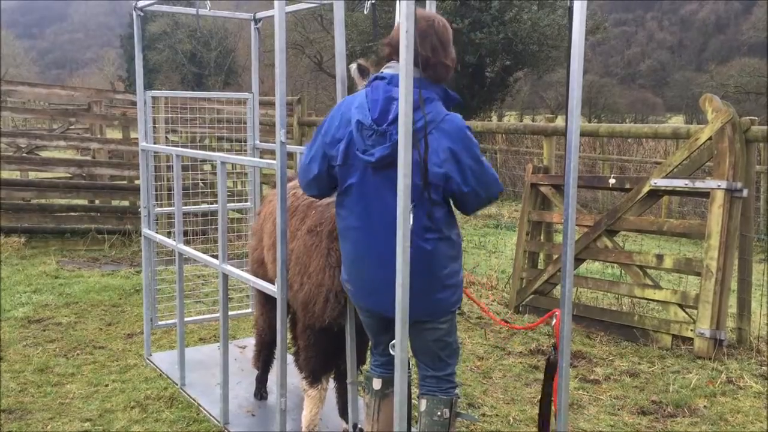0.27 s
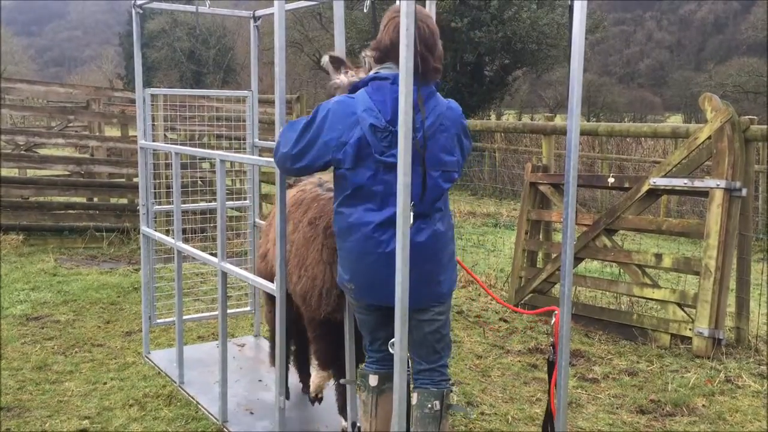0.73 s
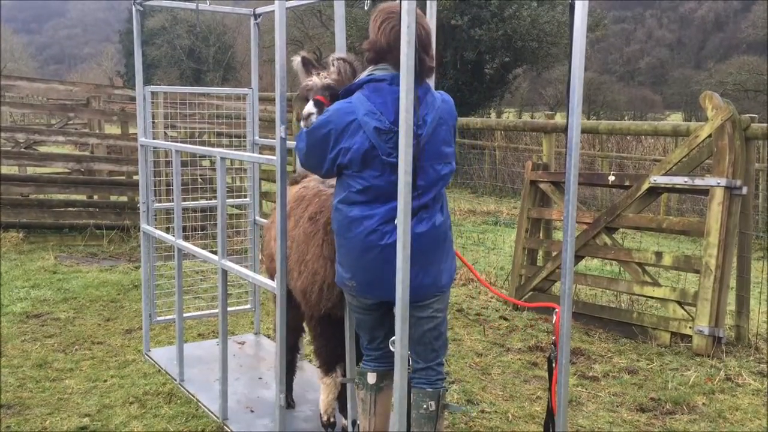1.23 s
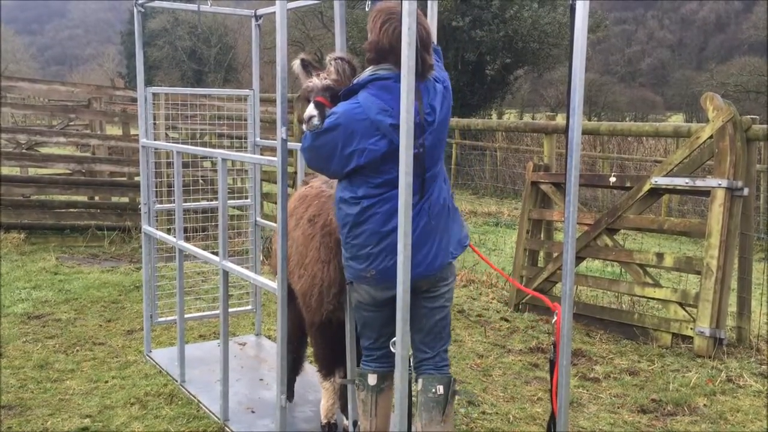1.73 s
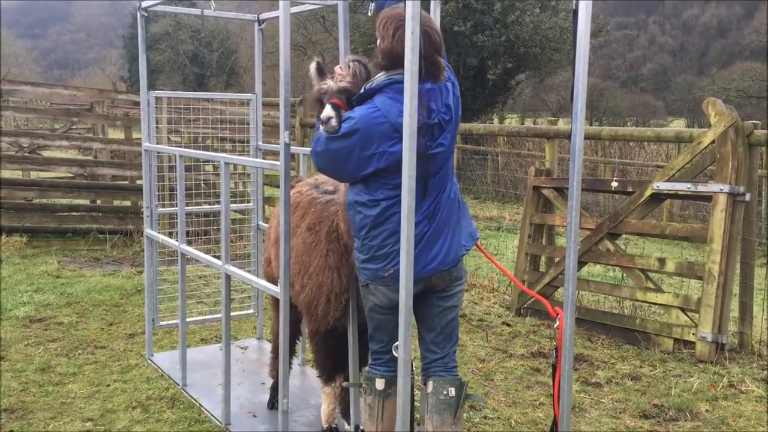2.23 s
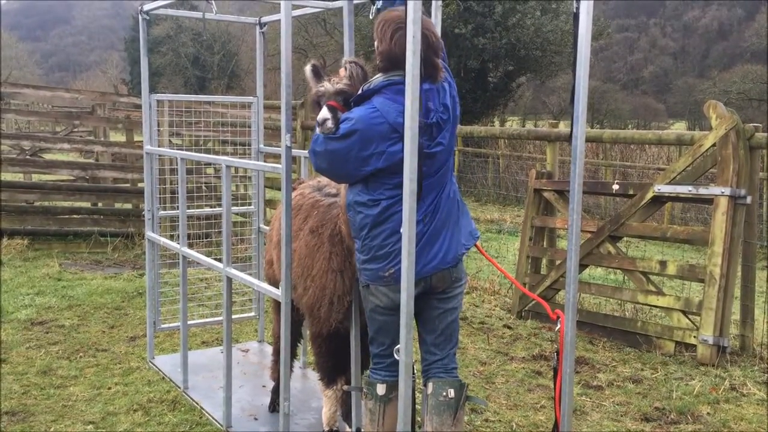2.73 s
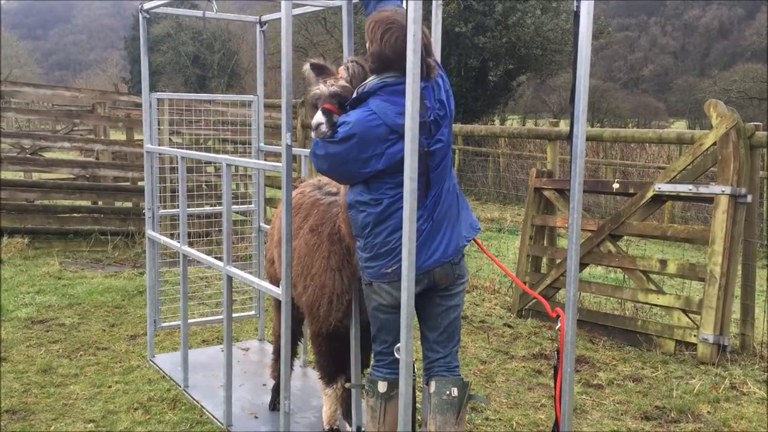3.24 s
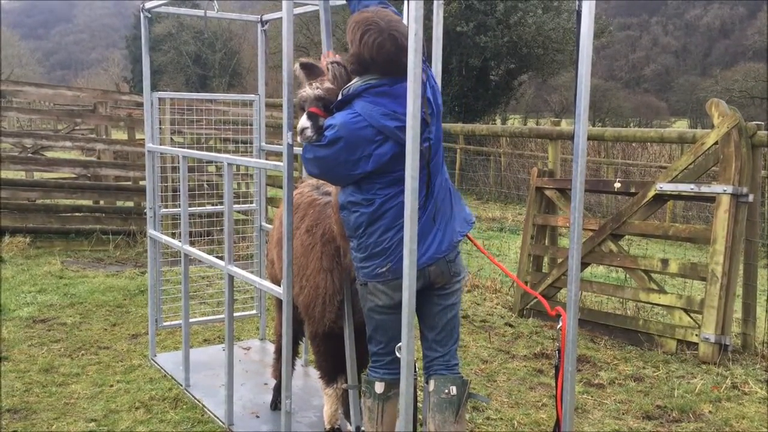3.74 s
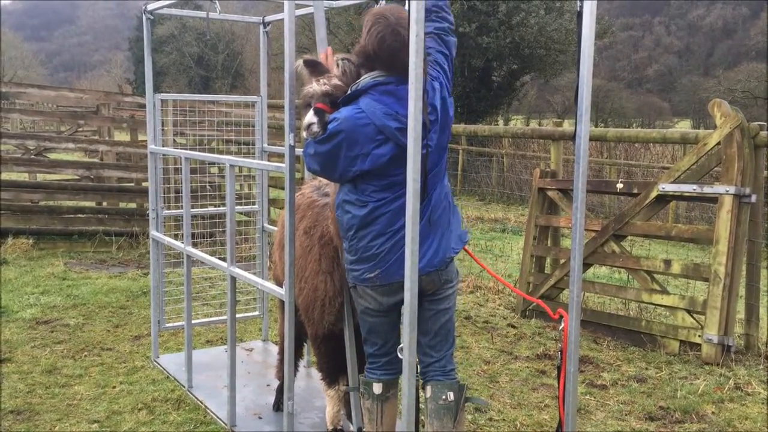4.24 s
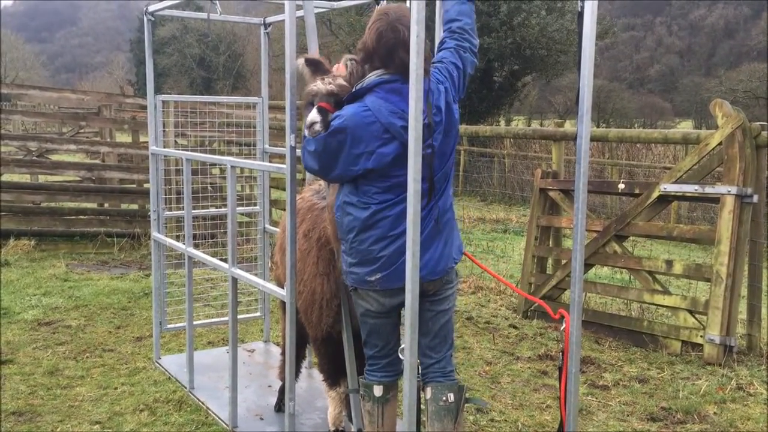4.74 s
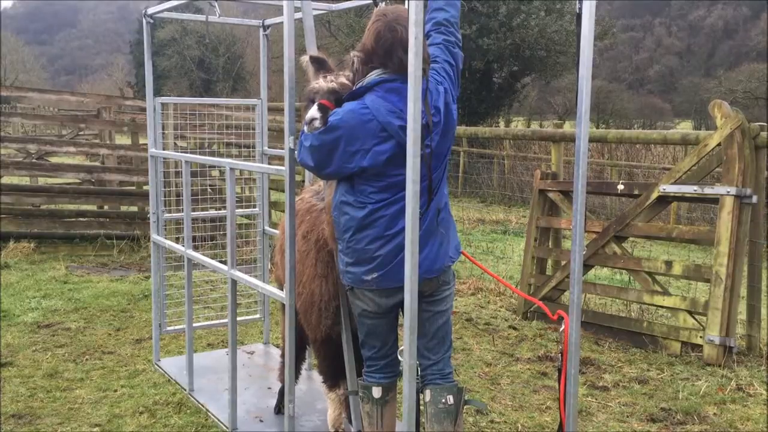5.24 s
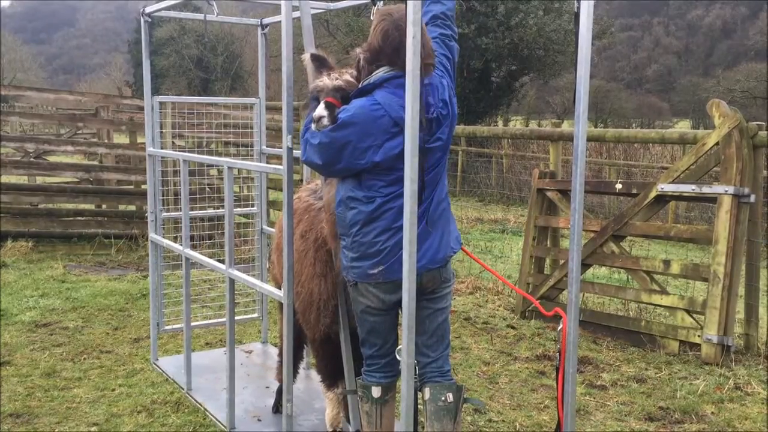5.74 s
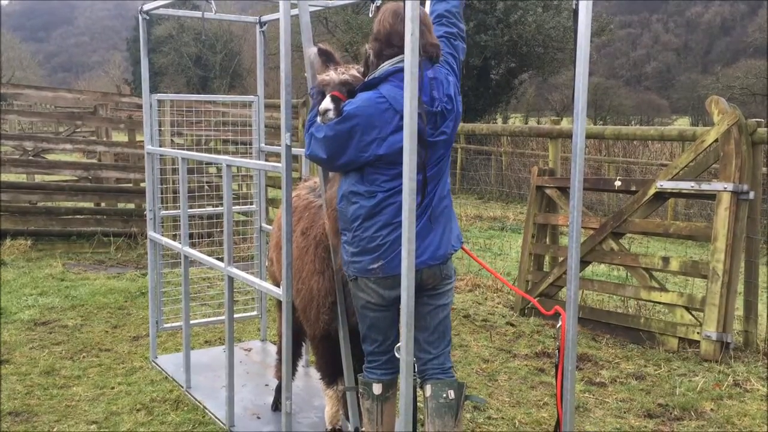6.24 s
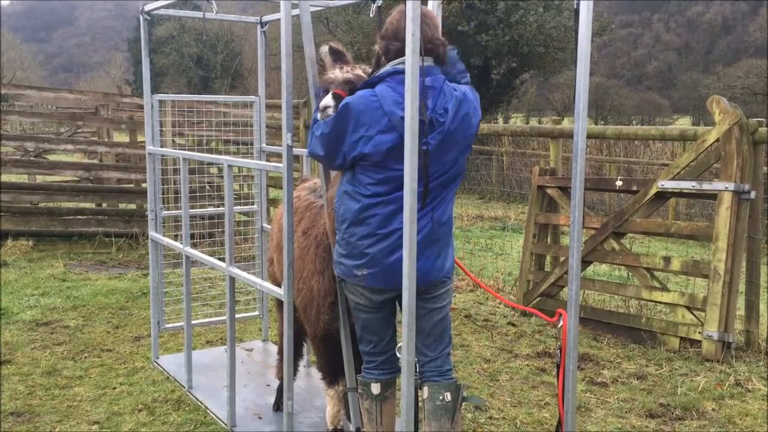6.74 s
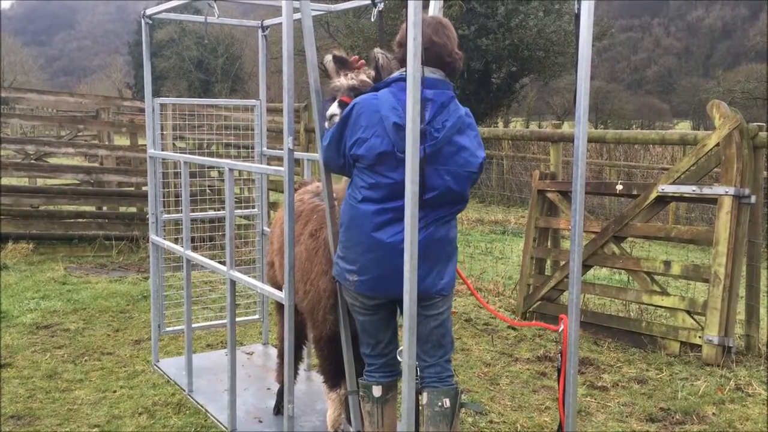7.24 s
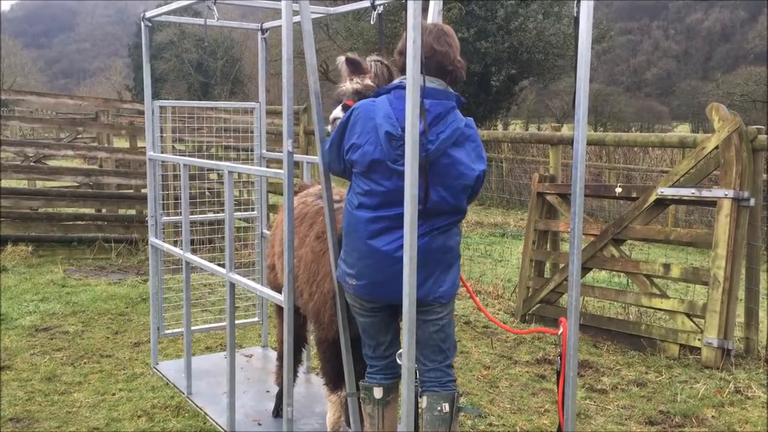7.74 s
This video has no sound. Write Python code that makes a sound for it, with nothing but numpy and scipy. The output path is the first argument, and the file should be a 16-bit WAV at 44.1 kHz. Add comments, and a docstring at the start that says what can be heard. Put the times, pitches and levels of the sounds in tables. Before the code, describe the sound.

Outdoor steel animal chute: dull foot thuds, small clinks, sharp metallic bangs with a hard latch clack, then a last rattling cluster.

```python
"""Steel handling chute in a field

Loose bars and a latch of galvanised steel knock, chatter and ring as an animal shifts and a handler works the gate:
impacts are shaped noise with decaying modes, and sliding bars are friction noise driving resonances.
Feet on the floor plate are damped sines, a coat and small ticks are coloured noise, birds are gliding tones
with echoes, and light wind bumping the microphone over a distant hiss is slowly modulated noise.
"""
import sys
import numpy as np
from scipy import signal
from scipy.fft import rfft, irfft
from scipy.io import wavfile
from scipy.ndimage import uniform_filter1d

SR = 44100
rng = np.random.default_rng(int(sys.argv[2]) if len(sys.argv) > 2 else 0)


def store_wav(level_fs):
    """Save 16-bit WAV to argv[1]."""
    pcm = np.round(np.clip(np.atleast_2d(level_fs), -1, 1) * 32767)
    wavfile.write(sys.argv[1], SR, pcm.T.astype(np.int16))


N = 351717  # length in samples

# Wind level against time: [t/s, level/dB]
GUST_CURVE = [(0, -56.5), (1.5, -53), (3.05, -59), (3.3, -50), (3.6, -58), (4.7, -58.5), (7.98, -58.5)]
# Spectra of the wind and of the far hiss: [f/Hz, relative level per Hz/dB]
WIND_SPECTRUM = [(18, -45), (55, 2), (90, -2.5), (190, -7), (300, -21), (550, -45.5)]
HISS_SPECTRUM = [(150, -36.5), (282, -6.5), (407, -10), (501, -13.5), (1010, -7.5), (1450, -11.5),
                 (16000, -39)]
# Strokes of the coat: [start t/s, loudest t/s, end t/s, level/dB]
COAT_RUBS = [(.44, .46, 0.52, -52), (.52, .66, 0.7, -57), (1.23, 1.295, 1.31, -61.5)]
# Spectrum of rubbed fabric: [f/Hz, relative level per Hz/dB]
COAT_SPECTRUM = [(150, -6.5), (300, 6.5), (800, -12.5), (2500, -12), (6000, -17.5), (9500, -17),
                 (15800, -20.5)]
# Small bright ticks: [t/s, initial level/dB, centre f/Hz]
TICK_EVENTS = [(0.4578, -45.5, 12400), (1.1228, -48.5, 9700), (1.2384, -46.5, 10400)]
# Whistled bird notes: [t/s, duration/s, start f/Hz, end f/Hz, level/dB]
BIRD_NOTES = [(0.669, 0.16, 2630, 2355, -67), (0.721, 0.042, 4450, 4440, -69.5),
              (1.166, 0.053, 3900, 3870, -68), (1.382, 0.09, 7060, 6540, -72),
              (1.567, 0.066, 7130, 6350, -65.5), (1.818, 0.024, 8400, 7350, -62),
              (1.874, 0.12, 7140, 6800, -75), (2.118, 0.14, 8170, 6320, -71.5),
              (2.183, 0.088, 2410, 2320, -65.5), (2.346, 0.088, 7300, 6300, -79),
              (5.23, 0.082, 7470, 6310, -72), (5.395, 0.082, 7600, 6100, -71),
              (5.554, 0.093, 7000, 5670, -72.5)]
# Husky bird chirps: [t/s, duration/s, settled f/Hz, level/dB, initial excess f/Hz, random share of f]
BIRD_CHIRPS = [(1.228, .11, 3330, -58.5, -2, 0.032), (1.615, 0.11, 3410, -62, 8, 0.024),
               (2.231, 0.023, 3330, -58.5, 500, 0.016), (2.304, 0.036, 3580, -54, 604, 0.01),
               (2.381, .1, 3440, -62.5, 493, 0.016), (2.5, 0.15, 3510, -76.5, -2, 0.014),
               (5.372, 0.041, 3460, -66, 499.5, 0.02)]
# Feet on the floor plate: [t/s, level/dB, settled f/Hz]
FOOT_THUDS = [(0.939, -26, 148), (1.096, -34, 104), (1.168, -34, 163), (1.287, -44, 373), (1.376, -43, 413),
              (2, -29, 189), (2.614, -40, 114), (7.674, -38, 75), (7.79, -40.5, 63.6)]
# Steel on steel: [t/s, level/dB, spectral peak f/Hz, treble fall/(dB per octave), hold/s, chatter T60/s,
# favoured tube f/Hz, relative tube level/dB, relative frame sway level/dB]
STEEL_KNOCKS = [(1.403, -45, 1980, 30, 0.0013, 0.084, 2680, -17, 4),
                (1.529, -42.5, 1310, 17.5, 0.01, 0.15, 1000, 0, -2.5),
                (1.993, -53, 1440, 12, 0.0097, 0.096, 2020, -29, 7),
                (2.06, -50.5, 1810, 17, 0.0029, 0.27, 1290, -25, 3),
                (3.308, -36, 1990, 14, 0.0063, 0.19, 1390, -3.5, -9.5),
                (3.336, -61.5, 1620, 19, 0.083, 0.37, 6230, -4.5, 3),
                (3.92, -26.5, 3800, 10, 0.0094, 0.1, 6700, -30.5, -0.5),
                (3.931, -22, 3900, 6.5, 0.0033, 0.16, 7050, -19.5, -7),
                (4.006, -36.5, 2690, 9.5, 0.0044, 0.21, 7500, -24, 1.5),
                (4.236, -43, 1300, 14, 0.016, 0.13, 1803, -23, -3),
                (4.566, -15.5, 2350, 7, 0.013, 0.021, 9300, -48, -47),
                (4.597, -23, 2350, 4.5, 0.0086, 0.2, 9200, -17, -8.5),
                (4.682, -51, 2530, 10, 0.0055, 0.43, 2700, 2.5, 1.5),
                (5.523, -55, 3280, 22, 0.0077, 0.17, 1730, -27.5, 5.5),
                (5.9417, -43.5, 1200, 21.5, 0.0026, 0.045, 3230, -17, -3.5),
                (6.066, -53.5, 1730, 12.5, 0.0076, 0.066, 3230, -24, 7.5),
                (6.188, -49, 2540, 28, 0.0031, 0.088, 2700, -30, -13),
                (6.334, -43, 2060, 18.5, 0.0084, 0.25, 1600, -21, -3.5),
                (6.399, -34.5, 2000, 9, 0.035, 0.13, 1900, -25, -7.5),
                (6.426, -22, 2850, 10.5, 0.0097, 0.092, 2700, -37, -11),
                (6.444, -28.5, 2120, 6.5, 0.0025, 0.28, 8000, -18.5, -40),
                (6.483, -40.5, 3070, 12, 0.012, 0.43, 4100, -4, 0.5),
                (6.619, -50, 2200, 11, 0.0064, 0.22, 3170, -11, 4),
                (6.684, -51.5, 1660, 14.5, 0.012, 0.17, 1290, -26.5, -1)]
# Bounces against the steel, coloured as the blow before: [t/s, level/dB]
STEEL_BOUNCES = [(3.941, -40), (3.951, -44), (4.028, -32), (4.046, -40), (4.106, -51), (4.612, -23),
                 (6.405, -24), (6.518, -40), (6.547, -37), (6.648, -58)]
# Modes of the tubes, the frame and the latch: [f/Hz, relative level/dB, T60/s]
TUBE_MODES = [(738, -3, .6), (1205, 2, .12), (1350, -1, .3), (1636, -4, .15), (2010, 1, .13),
              (2719, -4, .45), (3225, -1, .36), (3660, -8, .35), (4180, -1, .27), (4540, -4, .3),
              (6320, -14, .5), (6697, 4, .58), (6745, 1, .35), (9470, 2, .34), (10400, -3, .34)]
FRAME_MODES = [(120, 0, .3), (161, 0, .4), (366, -4, .3), (685, -3, .15), (415, -14, 1.)]
LATCH_MODES = [(hz, db, .11) for hz, db in [(2985, -5), (3246, -4.0), (3311, -4), (3685, -6), (3767, 0.5),
               (3812, -5.5), (4830, -12.5), (6340, -10.5), (6850, -9.5), (7420, -14.5), (9572, -8.5)]]
# Leans that set the longest frame mode humming: [t/s, level/dB]
FRAME_LEANS = [(2.463, -64), (3.169, -59), (3.318, -55.5)]
# A bar sliding along the tubes: [start t/s, loudest t/s, end t/s, level/dB]
BAR_SLIDES = [(3.14, 3.19, 3.26, -64.5), (3.68, 3.7, 3.78, -60), (3.87, 3.918, 3.925, -58.5),
              (4.45, 4.55, 4.57, -48), (5.82, 5.94, 6.22, -51)]
# Spectrum of the sliding friction: [f/Hz, relative level per Hz/dB]
SLIDE_SPECTRUM = [(120, -31.5), (300, -8), (1200, -11), (15000, -51.5)]
# Modes of the sliding bar: [f/Hz, relative level/dB]
BAR_MODES = [(366, -1), (711, -0.5), (969, -0.5), (1220, -1.5), (2050, -3.5), (3220, -7), (3430, -12),
             (4530, -15.5), (6750, -22)]
# The latch drops home and bounces: [t/s, level/dB]
LATCH_IMPACTS = [(4.57, -13.5), (4.605, -23.5)]

HISS_DB = -65.5
SLIDE_SWELL_DB, RUB_SWELL_DB = 14, 14  # swell of a stroke above its two ends
WAVER = 0.0061  # rms share of the pitch by which a whistle wavers
CHIRP_DROP_S, CHIRP_FADE_DB = 0.0018, 5.5  # time constant of the pitch drop; fade over the chirp
BREAK_DB = 3.5  # depth to which leaves and moving air break up far calls
THUD_T60_S = 0.066
# rise time constant of every blow; only a T60 above LOOSE_T60_S, which no row has, would lengthen it
RISE_S, LOOSE_T60_S, RISE_PER_T60 = 0.00098, 0.63, 0.042
BOUNCE_T60_S = 0.06
PLACE_DB = 19  # loss per octave away from the favoured tube pitch
TWIN_HZ, TWIN_DB = 26, -4  # rms detuning and relative level of each tube mode's near twin
TUBE_RISE_SHARE = 0.034  # share of the hold added to the tubes' rise time
BAR_T60_S, BAR_DB, BAR_CATCH_DB = 0.12, 5.5, 3.5
EDGE_HZ = 15900  # band limit


def gain_of(db):
    """Logarithmic scale: level in decibels to amplitude gain."""
    return 10 ** (np.asarray(db) / 20)


def evened(x):
    """Normalisation: unit root mean square."""
    return x / np.sqrt(np.mean(x ** 2) + 1e-20)


def add(mix, s, sound):
    """Superposition: adds a sound to the mix, in place, from time s."""
    part = mix[round(s * SR):][:len(sound)]
    part += sound[:len(part)]


def coloured(x, points):
    """Spectral filtering: noise x weighted by (Hz, dB) points joined over log frequency, rms 1."""
    f, db = np.transpose(points)
    hz = np.fft.rfftfreq(len(x), 1 / SR)
    weight = gain_of(np.interp(np.log(hz + 1), np.log(f + 1), db))
    return evened(irfft(rfft(x) * weight, len(x)))


def played(rows):
    """Amplitude envelope: a (s, dB) curve as gain per sample, at -120 dB outside."""
    s, db = np.transpose(rows)
    return gain_of(np.interp(np.arange(N) / SR, s, db, -120, -120))


def strokes(rows, swell_db):
    """Friction envelope: each stroke swells to its loudest moment and sinks, practically silent outside."""
    return sum(
        played([(start, db - swell_db), (top, db), (end, db - swell_db)])
        for start, top, end, db in rows
    )


def lumps(hz):
    """Random modulation: low-passed noise of rms 1, changing about hz times a second."""
    lowpass = signal.butter(2, hz, fs=SR, output="sos")
    return evened(signal.sosfilt(lowpass, rng.standard_normal(N)))


def ring(modes, t, weight_db, turns, rise):
    """Modal superposition: decaying sines, each with its weight and phase, share one exponential rise."""
    hz, db, t60 = np.array(modes).T[:, :, None]
    waves = np.sin(2 * np.pi * (hz * t + turns[:len(modes), None]))
    decay = gain_of(db + weight_db[:len(modes), None] - 60 * t / t60)
    return (1 - np.exp(-t / rise)) * (decay * waves).sum(0)


def air():
    """Turbulence noise: lumpy bass of the wind, over a smoother far hiss."""
    wind = coloured(rng.standard_normal(N), WIND_SPECTRUM)
    wind = evened(wind * gain_of(3 * lumps(12)))
    hiss = coloured(rng.standard_normal(N), HISS_SPECTRUM) * gain_of(0.9 * lumps(8))
    return wind * played(GUST_CURVE) + hiss * gain_of(HISS_DB)


def coat():
    """Fabric friction: broadband noise made grainy by rapid random modulation."""
    level = strokes(COAT_RUBS, RUB_SWELL_DB)
    return coloured(rng.standard_normal(N), COAT_SPECTRUM) * gain_of(3.8 * lumps(150)) * level


def ticks():
    """Transient noise: a narrow high band under a rapid exponential decay."""
    out, t = np.zeros(N), np.arange(1024) / SR
    noises = rng.standard_normal((len(TICK_EVENTS), len(t)))
    for (s, db, hz), noise in zip(TICK_EVENTS, noises):
        band = coloured(noise, [(hz / 2, -22), (hz, 0), (hz * 2, -30)])
        add(out, s, gain_of(db - 60 * t / 0.026) * band)
    return out


def birds():
    """Frequency modulation and scattering: gliding whistles and husky chirps, echoed by the trees."""
    out = np.zeros(N)
    dice = rng.standard_normal((len(BIRD_NOTES) + len(BIRD_CHIRPS), SR // 4))
    flutter = evened(uniform_filter1d(dice, 150, axis=1))
    for (s, length, start_hz, end_hz, db), z in zip(BIRD_NOTES, flutter):
        u = np.linspace(0, 1, round(length * SR))
        glide_hz = end_hz + (start_hz - end_hz) * (1 - u) ** 2
        hz = glide_hz * (1 + WAVER * z[:len(u)])
        shape = gain_of(db) * np.sin(np.pi * u) ** 0.14
        add(out, s, shape * np.sin(2 * np.pi * np.cumsum(hz) / SR))
    for (s, length, pitch_hz, db, drop_hz, husky), z in zip(BIRD_CHIRPS, flutter[len(BIRD_NOTES):]):
        u = np.linspace(0, 1, round(length * SR))
        glide_hz = pitch_hz + drop_hz * np.exp(-u * length / CHIRP_DROP_S)
        hz = glide_hz * (1 + husky * z[:len(u)])
        shape = gain_of(db - CHIRP_FADE_DB * u) * np.sin(np.pi * u) ** 0.13
        add(out, s, shape * np.sin(2 * np.pi * np.cumsum(hz) / SR))
    out *= evened(gain_of(BREAK_DB * lumps(40)))
    t = np.arange(SR // 4) / SR
    echoes = rng.standard_normal(len(t)) * gain_of(-60 * t / 0.72)
    echoes /= np.linalg.norm(echoes)
    return out + gain_of(-7) * signal.oaconvolve(out, echoes)[:N]


def thuds():
    """Damped oscillation: a low sine whose pitch sags onto its settled frequency."""
    out, t = np.zeros(N), np.arange(SR // 4) / SR
    for s, db, hz in FOOT_THUDS:
        sag = 0.0013 * (1 - np.exp(-t / 0.0042))
        swing = np.sin(2 * np.pi * hz * (t + sag))
        add(out, s, gain_of(db - 60 * t / THUD_T60_S) * (1 - np.exp(-t / 0.0019)) * swing)
    return out


def blow_envelope(t, s, end, db, since_hold, t60, rise):
    """Repeated impact: energies of a blow and its bounces add; also gives the time the treble has been dying."""
    shape = (1 - np.exp(-t / rise)) ** 2 * gain_of(-60 * since_hold / t60)
    treble_age = since_hold
    for at, bounce_db in STEEL_BOUNCES:
        if s < at < end:
            since = np.maximum(t - at + s, 0)
            again = (1 - np.exp(-since / RISE_S)) * gain_of(bounce_db - db - 60 * since / BOUNCE_T60_S)
            shape = np.hypot(shape, again)
            treble_age = np.minimum(treble_age, np.where(since > 0, since, 1))
    return shape, treble_age


def steel_chatter(noise, dice, top, fall_db, t60, treble_age):
    """High modal density: many tiny impacts excite mesh panels, whose treble dies sooner than the body."""
    # uneven from one millisecond to the next
    grit = evened(gain_of(1.9 * evened(signal.oaconvolve(dice, np.hanning(150), "same"))))
    # countless short panel modes: a ragged spectrum, new for every blow
    ragged = gain_of(5 * evened(signal.oaconvolve(dice, np.hanning(80), "same")))
    panel = irfft(rfft(noise) * ragged[-(len(noise) // 2 + 1):], len(noise))
    below = [(top / 32, -55), (top / 2, -0.6 * fall_db)]
    chatter = coloured(panel, below + [(top, 0), (top * 32, -5 * fall_db)])
    body = signal.oaconvolve(chatter, np.hanning(13) / 6, "same")
    treble = (chatter - body) * gain_of(-25 * treble_age / t60)
    return (body + treble), grit


def tube_ring(t, dice, place_hz, rise):
    """Modal beating: the place of the blow favours some modes; tubes never quite in tune give near twins."""
    tube_hz = np.array(TUBE_MODES)[:, 0]
    favour_db = -PLACE_DB * abs(np.log2(tube_hz / place_hz)) + 1.5 * dice[:len(TUBE_MODES)]
    detuning = dice[60:60 + len(TUBE_MODES), None] * [TWIN_HZ, 0, 0]
    tubes = ring(TUBE_MODES, t, favour_db, dice[20:], rise)
    twins = ring(np.array(TUBE_MODES) + detuning, t, favour_db, dice[80:], rise)
    return tubes + gain_of(TWIN_DB) * twins


def frame_sway(t, noise, dice, since_hold, t60):
    """Low-frequency structural response: decaying rumble joined by the frame modes."""
    rumble = coloured(noise, [(40, -5.5), (150, -2.5), (400, -5), (900, -11.5), (9000, -64)])
    rumble *= (1 - np.exp(-t / 0.02)) * gain_of(-60 * since_hold / (t60 + 0.032))
    frame = ring(FRAME_MODES, t, 2 * dice[40:], dice[50:], 0.01)
    return rumble + gain_of(-6.5) * frame


def knocks():
    """Impact excitation: each blow makes loose steel chatter, rings the tubes and shakes the frame."""
    out, t = np.zeros(N), np.arange(SR * 3 // 4) / SR
    ends = [row[0] for row in STEEL_KNOCKS[1:]] + [N / SR]
    draws = rng.standard_normal((len(STEEL_KNOCKS), 2, len(t)))
    for row, end, (noise, dice) in zip(STEEL_KNOCKS, ends, draws):
        s, db, top, fall_db, hold, t60, place_hz, tube_db, sway_db = row
        rise = RISE_S + RISE_PER_T60 * max(t60 - LOOSE_T60_S, 0)
        since_hold = np.maximum(t - hold, 0)
        shape, treble_age = blow_envelope(t, s, end, db, since_hold, t60, rise)
        chatter, grit = steel_chatter(noise, dice, top, fall_db, t60, treble_age)
        tubes = gain_of(tube_db) * tube_ring(t, dice, place_hz, rise + TUBE_RISE_SHARE * hold)
        sway = gain_of(sway_db) * frame_sway(t, noise, dice, since_hold, t60)
        add(out, s, gain_of(db) * (chatter * shape * grit + tubes + sway))
    return out


def leans():
    """Single-mode excitation: the frame's last, longest mode rises and decays alone."""
    out, t = np.zeros(N), np.arange(SR) / SR
    own_level_undone_db = -np.array(FRAME_MODES)[-1:, 1]
    for (s, db), turns in zip(FRAME_LEANS, rng.random((len(FRAME_LEANS), 2))):
        add(out, s, gain_of(db) * ring(FRAME_MODES[-1:], t, own_level_undone_db, turns, 0.011))
    return out


def slides():
    """Friction-driven resonance: uneven noise, with each bar mode caught and let go on its own."""
    level, t = strokes(BAR_SLIDES, SLIDE_SWELL_DB), np.arange(SR // 8) / SR
    friction = coloured(rng.standard_normal(N), SLIDE_SPECTRUM)
    out = level * friction * evened(gain_of(1.6 * lumps(60)))
    for hz, db in BAR_MODES:
        mode = gain_of(-60 * t / BAR_T60_S) * np.sin(2 * np.pi * hz * t)
        mode /= np.linalg.norm(mode)
        catch = rng.standard_normal(N) * evened(gain_of(BAR_CATCH_DB * lumps(15)))
        song = signal.oaconvolve(level * catch, mode)[:N]
        out += gain_of(BAR_DB + db) * song / len(BAR_MODES) ** 0.5
    return out


def latch():
    """Modal impact: a small solid part rings in a few strong, short modes."""
    out, t = np.zeros(N), np.arange(SR // 4) / SR
    draws = rng.standard_normal((len(LATCH_IMPACTS), 40))
    for (s, db), dice in zip(LATCH_IMPACTS, draws):
        add(out, s, gain_of(db) * ring(LATCH_MODES, t, dice, dice[20:], 0.002))
    return out


def scene():
    """Superposition: all sources sum at one microphone."""
    steel = knocks() + latch() + leans() + slides()
    return (steel + thuds() + ticks() + coat() + birds() + air())[None]


def record(dry):
    """Band limitation: a linear-phase low-pass filter."""
    lowpass = signal.firwin(511, EDGE_HZ, window=("kaiser", 9), fs=SR)
    return signal.oaconvolve(dry, lowpass[None], "same")


dry = scene()
out = record(dry)
store_wav(out)
```